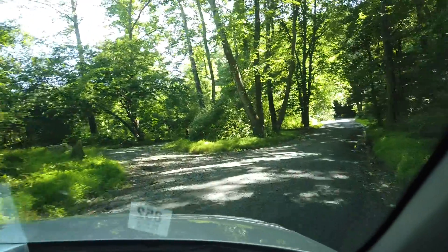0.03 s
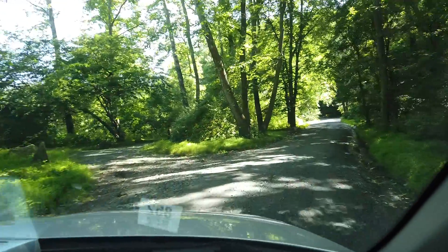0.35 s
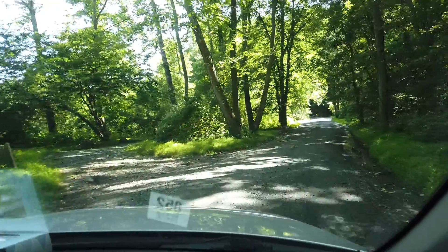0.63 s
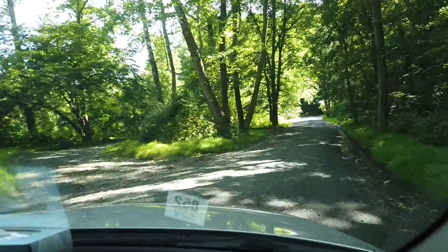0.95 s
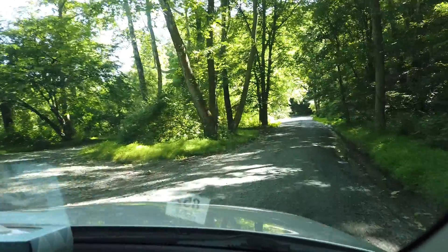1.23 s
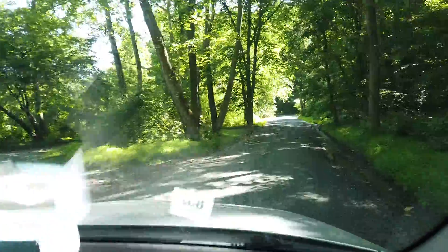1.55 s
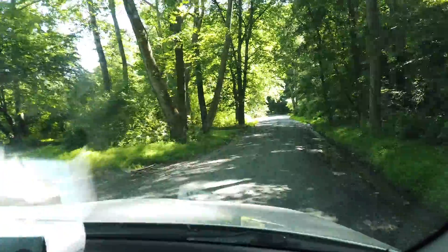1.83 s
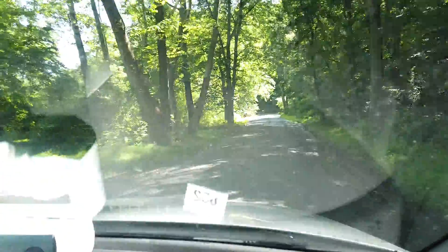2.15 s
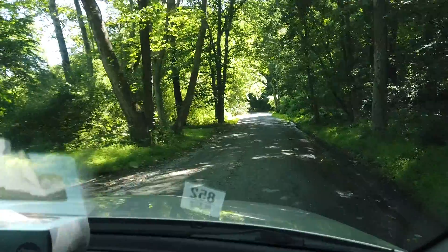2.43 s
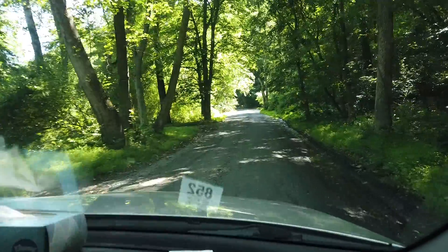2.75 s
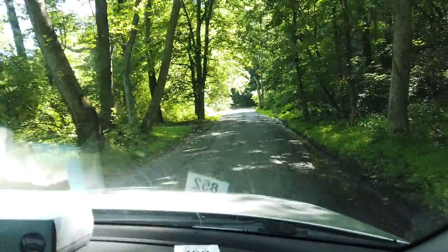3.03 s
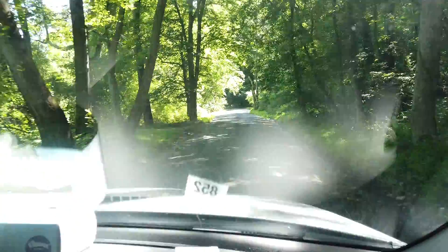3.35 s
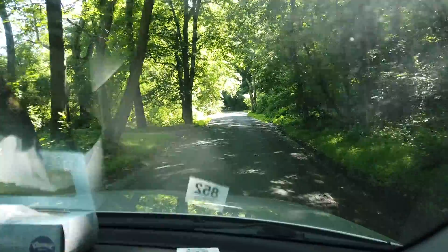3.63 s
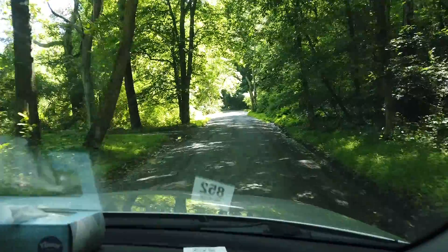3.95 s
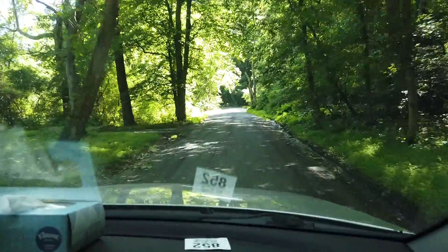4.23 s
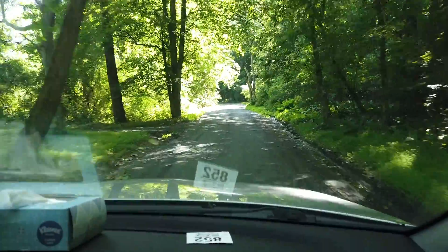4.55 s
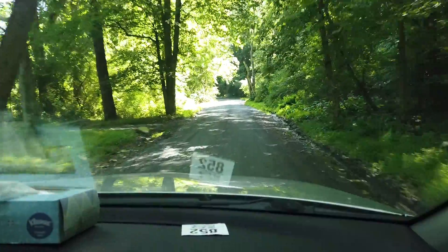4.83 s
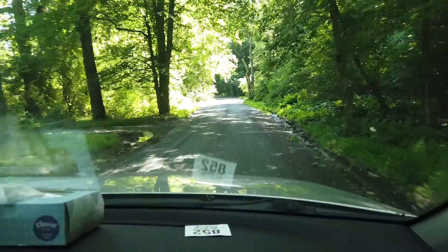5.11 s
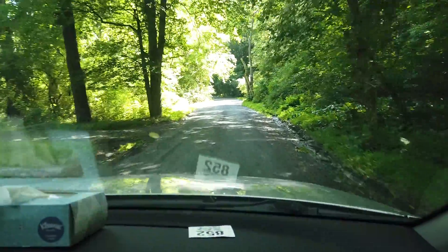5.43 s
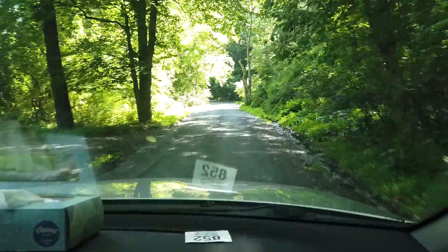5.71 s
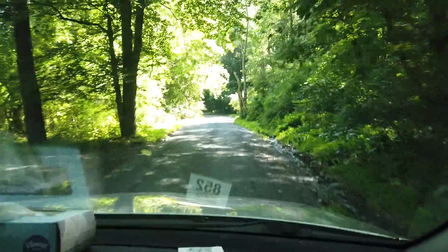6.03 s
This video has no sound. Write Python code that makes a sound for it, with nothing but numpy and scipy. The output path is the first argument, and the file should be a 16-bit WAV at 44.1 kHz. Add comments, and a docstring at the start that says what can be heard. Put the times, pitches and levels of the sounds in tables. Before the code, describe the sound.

A car rolls slowly along a gravel lane, heard from inside for about six seconds. A deep, uneven rumble dominates, with tyre drone and soft, muffled crunching. Small stones pop and briefly grind under the tyres, thickest in the first half second, with more clusters around 2.7, 3.6, 4.1, 4.6 and 6.1 seconds. The low engine note swells and climbs between 0.3 and 1.6 seconds. Ruts bring low jolts near 1.3 and 1.6 seconds and repeatedly from 3.6 to 4.9. Dull suspension knocks come around 2.2 to 2.7 seconds, at 4.7, and from 5.6 to 6. Soft tyre scuffs occur near 0.4 and 4 seconds. A faint gear whine appears at 0.5 and returns from 4 seconds. Tiny trim squeaks come near 2.8, 4.7 and 5.3, and a very faint buzz after 3. Close by, something light and loose rustles and ticks now and then.

```python
"""A car rumbles slowly along a gravel lane, heard from inside the cabin.
Ruts jolt the body while the tyres drone, crunch and scrub; single stones grind in the tread,
pop free and ring the wheel-well liner. The engine climbs as the car pulls away, the gears whine
faintly, the suspension knocks, trim squeaks and a thin buzz passes.
Close by, something light and loose rustles and ticks as it sways."""
import sys
import numpy as np
from scipy import signal
from scipy.fft import rfft, irfft, next_fast_len
from scipy.io import wavfile
from scipy.ndimage import uniform_filter1d

SR = 44100
rng = np.random.default_rng(int(sys.argv[2]) if len(sys.argv) > 2 else 0)


def to_wav(s):
    """Save 16-bit WAV."""
    ch = np.atleast_2d(s).T  # columns
    pcm = np.round(np.clip(ch, -1, 1) * 32767)  # PCM
    wavfile.write(sys.argv[1], SR, pcm.astype(np.int16))


N = 276815
T = np.arange(N) / SR


def amp(db):
    """Decibels to gain."""
    return 10 ** (np.asarray(db) / 20)


def unit(x):
    """Scales to an rms of one."""
    return x / np.sqrt(np.mean(x ** 2) + 1e-30)


def peaked(x, db):
    """Sets the level of the loudest 3 ms."""
    return x * amp(db) / np.sqrt(uniform_filter1d((x ** 2).mean(0), size=130).max())


def add(mix, s, sound):
    """Mixes a stereo sound in at time s."""
    part = mix[:, max(round(s * SR), 0):][:, :sound.shape[1]]
    part += sound[:, :part.shape[1]]


def curves(rows):
    """Turns timed breakpoints into one automation curve per column."""
    times, *columns = np.transpose(rows)
    return [np.interp(T, times, column) for column in columns]


def swell(s, rise_s, fall_s):
    """A rounded envelope of height one that peaks at time s."""
    return np.exp(-.5 * ((T - s) / np.where(T < s, rise_s, fall_s)) ** 2)


def flutter(shape, samples):
    """A fast random modulator: noise smoothed over so many samples."""
    return unit(uniform_filter1d(rng.standard_normal(shape), size=samples))


def eq_db(points, hz):
    """An EQ curve of straight lines over log frequency."""
    freqs, db = np.transpose(points)
    return np.interp(np.log(hz + 1), np.log(freqs + 1), db)


def bell(hz, centre_hz, octaves):
    """A bell-shaped resonance of height one."""
    return np.exp(-.5 * (np.log2((hz + 1) / centre_hz) / octaves) ** 2)


def lifts(modes, hz):
    """The boost in dB from a set of resonances."""
    return sum(db / (1 + (2 * (hz - centre) / width) ** 2) for centre, width, db in modes)


def cabin(hz, spacing_hz=115.5, feedback=.18, fade_hz=1490):
    """Echo between the side windows: a comb filter, in dB, that fades in the treble."""
    kept = feedback / (1 + (hz / fade_hz) ** 4)
    return -20 * np.log10(abs(1 - kept * np.exp(-2j * np.pi * hz / spacing_hz)))


# stereo width: f/Hz, side against mid/dB
WIDTH = [(40, -40), (90, -33), (160, -32), (330, -18.5), (700, -17), (1400, -9.5), (2600, -4.5),
         (4000, 1.5), (6000, 0), (8500, -1.5), (15000, -.5)]
def colour(pair, spectrum, extra_db=lambda hz: 0):
    """Minimum-phase EQ; two unrelated signals become mid and side, so bass is mono and treble wide."""
    n = pair.shape[1]
    size = 2 * next_fast_len(n // 2 + 2048)
    hz = np.fft.rfftfreq(size, 1 / SR)
    cepstrum = irfft(np.log(amp(eq_db(spectrum, hz) + extra_db(hz))), size)
    response = np.exp(rfft(cepstrum * (1 + np.sign(np.fft.fftfreq(size)))))
    width = amp(eq_db(WIDTH, hz))
    mid, side = rfft(pair, size) * response / np.sqrt(1 + width ** 2)
    return irfft(np.array([mid + width * side, mid - width * side]), size)[:, :n]


def noise(spectrum, modes=(), echo=0):
    """A stereo bed of coloured noise, with resonances and a share of cabin echo."""
    white = rng.standard_normal((2, N + SR))
    return unit(colour(white, spectrum, lambda hz: lifts(modes, hz) + echo * cabin(hz))[:, SR:])


def wander(spectrum, depth_db):
    """A randomly drifting gain; the spectrum sets how fast it moves."""
    return unit(amp(depth_db * noise(spectrum)[0]))


def steadied(x, span_s):
    """Levels out swells that last longer than span_s."""
    power = signal.fftconvolve((x ** 2).mean(0), np.hanning(int(span_s * SR)), "same")
    return unit(x / np.sqrt(power + 1e-9))


# roughness of the lane, and single ruts: t/s, rumble level/dB, drone level/dB
LANE = [(0, -26, -40), (.65, -20, -39), (1.4, -23, -38.5), (1.8, -24.5, -37.5), (2.4, -26, -38.5),
        (2.7, -22.5, -37.5), (3.25, -25, -38), (3.9, -26, -39), (4.9, -22.5, -36), (5.35, -25, -38),
        (5.8, -28.5, -33.5), (6.28, -22.5, -35.5)]
RUTS = [(1.06, -31, -36), (1.282, -16.5, -33), (1.6, -16.5, -56), (2.569, -19, -30), (3.591, -14, -36.5),
        (3.71, -23, -32.5), (3.989, -13.5, -59), (4.292, -16, -38), (4.699, -12.5, -47), (4.85, -17, -48),
        (5.578, -20, -28.5), (6.01, -46, -31), (6.26, -22, -39)]
# body rumble and tyre drone: f/Hz, level/dB
RUMBLE_EQ = [(8, -58.5), (16, -27.5), (22, -4), (30, -6.5), (41, -3), (51, -7), (63, -18.5), (90, -48.5),
             (200, -110)]
DRONE_EQ = [(40, -28), (62, 5), (80, 13), (105, 8), (135, 3), (165, -7), (240, -49.5), (600, -110)]
def body():
    """The uneven lane shakes the body and makes the tyres drone; each rut adds a jolt."""
    rumble_gain, drone_gain = amp(curves(LANE))
    for s, rumble_db, drone_db in RUTS:
        jolt = swell(s, rise_s=.03, fall_s=.04)
        rumble_gain = np.hypot(rumble_gain, amp(rumble_db) * jolt)
        drone_gain = np.hypot(drone_gain, amp(drone_db) * jolt)
    rumble = rumble_gain * steadied(noise(RUMBLE_EQ), span_s=.11)
    drone = drone_gain * steadied(noise(DRONE_EQ), span_s=.15)
    return rumble + drone


# tyres on gravel: t/s, roar level/dB, crunch level/dB
TYRES = [(0, -48.5, -48.5), (.5, -50, -59), (.68, -51, -54.5), (1.0, -51, -55.5), (1.6, -50, -55),
         (2.35, -48.5, -53.5), (2.55, -51, -58), (3.3, -50, -57.5), (4.1, -47.5, -58.5),
         (5.3, -47.5, -57.5), (6.0, -44, -57), (6.28, -48.5, -55.5)]
# road roar: f/Hz, level/dB
ROAR_EQ = [(110, -28), (165, 0), (205, 2.5), (265, -5), (320, -10), (400, -12), (470, -15), (530, -20.5),
           (700, -23.5), (850, -22.5), (1100, -42.5), (2000, -41.5), (6000, -100)]
def tyres():
    """The rolling tyres send a lumpy roar through the floor and crunch the gravel."""
    roar_db, crunch_db = curves(TYRES)
    lumps = wander([(1, -14), (3, -2), (9, 0), (16, -8), (40, -60)], depth_db=1.4)
    roar = lumps * steadied(noise(ROAR_EQ, echo=.042), span_s=.27)
    return amp(roar_db) * roar + amp(crunch_db) * gravel()


# gravel crunch: f/Hz, level/dB
CRUNCH_EQ = [(240, -11.5), (420, -0.5), (600, -2.5), (850, -4), (1100, -6), (1500, -5), (2000, -11),
             (2900, -11.5), (3500, -21), (5000, -21.5), (7000, -28.5), (12000, -52.5)]
# resonances of the doors and glass: f/Hz, width/Hz, boost/dB
PANELS = [(836, 130, 4), (951, 76, 4.5), (1510, 18, 2), (1780, 46, 3), (2230, 32, 6.5), (2480, 250, 4.5),
          (2730, 50, 4.5), (2986, 93, 3.5), (3380, 120, 3.5)]
def gravel(grains_per_s=300, pitches=10, spread_db=5.5, ring_db=7, crack_s=.0034, scatter_s=.021):
    """Small stones crack in clumps over a soft wash, muffled by the doors and glass."""
    t = np.arange(SR // 5) / SR
    envelope = np.exp(-t / crack_s) + amp(6) * np.exp(-t / scatter_s)
    clumps = wander([(2, -10), (5, 0), (14, 0), (40, -30), (100, -90)], depth_db=1.3)
    grains = np.zeros((2, N))
    for pitch_hz in np.geomspace(620, 1850, pitches):
        sizes = clumps * amp(spread_db * np.minimum(rng.exponential(1, N), 3))
        hits = sizes * (rng.random(N) < grains_per_s / pitches / SR)
        tone = lambda hz: lifts(PANELS, hz) + cabin(hz) + ring_db * bell(hz, pitch_hz, octaves=.44)
        grain = colour(envelope * rng.standard_normal((2, len(t))), CRUNCH_EQ, tone)
        grains += signal.oaconvolve(hits[None], grain, axes=1)[:, :N]
    wash = noise(CRUNCH_EQ, PANELS, echo=.92)
    return amp(-1.5) * unit(grains) + amp(-8) * wash


# background hiss: f/Hz, level/dB
HISS_EQ = [(3500, -2.5), (5000, -7.5), (7000, -12.5), (9000, -9.5), (10600, -8), (12000, -12),
           (15500, -10.5)]
def hiss():
    """A faint, steady bed of hiss."""
    return amp(-70.5) * noise(HISS_EQ)


# stones squeezed out from under the tyres: t/s, level/dB, f/Hz, treble/dB
POPS = [(0.0535, -35, 860, -18), (0.066, -33, 910, -26), (0.092, -41, 1400, -26), (0.177, -46, 965, -41),
        (0.213, -48, 1180, -36), (0.309, -47.5, 1350, -32), (0.326, -40, 910, -22),
        (0.344, -38.5, 670, -34), (0.383, -44, 704, -35), (0.441, -49, 900, -22), (0.466, -44.5, 630, -17),
        (0.521, -42.5, 1750, -23), (0.712, -48.5, 1440, -11), (0.807, -46, 1210, -29),
        (0.946, -45, 1360, -21), (1.33, -33, 774, -45), (1.403, -44.5, 1230, -31),
        (1.617, -45.5, 1340, -23), (1.696, -40, 950, -42), (1.92, -47.5, 1280, -45), (1.991, -42, 960, -34),
        (2.005, -43, 980, -25), (2.234, -41, 860, -52), (2.55, -40.5, 940, -21), (2.6725, -37.5, 960, -21),
        (2.681, -42.5, 1150, -24), (2.731, -53, 1210, -28), (2.818, -37.5, 1054, -26),
        (2.834, -41, 1330, -27), (2.843, -43.5, 1400, -15), (3.016, -51, 1216, -26), (3.287, -48, 1830, -5),
        (3.375, -46.5, 2144, 7), (3.534, -50.5, 2540, -16), (3.572, -41.5, 880, -38),
        (3.579, -39, 900, -30), (3.586, -38.5, 920, -32), (3.646, -41, 2183, -26),
        (4.021, -46.5, 1375, -29), (4.144, -39.5, 830, -28), (4.154, -39, 800, -31), (4.596, -40, 945, -27),
        (4.608, -43.5, 835, -25), (4.692, -48, 1390, -17), (4.823, -51.5, 2465, -12),
        (4.951, -58, 1980, -8), (5.028, -51.5, 2040, -12), (6.062, -38, 830, -24), (6.068, -35.5, 930, -41),
        (6.076, -41, 910, -9)]
# a stone heard from the cabin: f/Hz, level/dB
STONE_EQ = [(200, -14.5), (480, -1.5), (650, 3), (840, 2.5), (1200, -1), (1750, -5), (2200, -9.5),
            (2900, -10.5), (3700, -22.5), (5200, -23), (7000, -41), (15000, -53.5)]
def pops(usual_hz=900, usual_treble_db=-19.5, ring_db=8, thin_db_per_octave=-5, tail_s=.067):
    """Stones snap off the tread and rattle through the wheel well; small, high ones scrape longer."""
    out, t = np.zeros((2, N)), np.arange(SR // 7) / SR
    for s, db, pitch_hz, treble_db in POPS:
        def tone(hz):
            ring = ring_db * bell(hz, pitch_hz, octaves=.22)
            octaves_below = np.clip(np.log2(pitch_hz / (hz + 1)), 0, max(np.log2(pitch_hz / usual_hz), 0))
            low_cut = thin_db_per_octave * octaves_below  # high stones have less body
            high_shelf = (treble_db - usual_treble_db) * hz ** 2 / (hz ** 2 + 2000 ** 2)
            return .98 * lifts(PANELS, hz) + .63 * cabin(hz) + ring + low_cut + high_shelf

        contact_s = .0032 * (pitch_hz / usual_hz) ** 1.1
        contact = (1 - np.exp(-2 * t / contact_s)) * np.exp(-t / contact_s)
        rattle = unit(amp(2.5 * flutter(len(t), samples=150)))
        crack = colour(contact * rng.standard_normal((2, len(t))), STONE_EQ, tone)
        tail = unit(colour(rattle * rng.standard_normal((2, len(t))), STONE_EQ, tone))
        tail *= (1 - np.exp(-t / contact_s)) * np.exp(-t / tail_s)
        ringing = rattle * liner(t, pitch_hz, contact_s)
        add(out, s - contact_s / 2, peaked(crack, db - 1) + amp(db - 15) * tail + amp(db) * ringing)
    return out


# modes of the plastic wheel-well liner: f/Hz, level/dB, t60/s
LINER = [(590.6, -14, .18), (832, -4, .12), (939, -11.5, 0.13), (1110, -20, 0.32), (1490, -14.5, 0.14),
         (1793, -10, 0.16), (2700, -9, 0.17)]
def liner(t, pitch_hz, contact_s, uneven_db=2.5, detune=.011):
    """The hollow liner rings when struck, most near the stone's pitch and differently at each spot."""
    out = np.zeros((2, len(t)))
    for hz, db, t60 in LINER:
        strength, shift, phase, spread = rng.standard_normal(4)
        stereo_phase = np.array([[1], [-1]]) * spread * amp(eq_db(WIDTH, hz))
        tone = np.sin(2 * np.pi * (hz * (1 + detune * shift) * t + phase) + stereo_phase)
        gain = amp(db + uneven_db * strength) * bell(hz, pitch_hz, octaves=.67)
        out += gain * np.exp(-np.log(1000) * t / t60) * tone
    return out * (1 - np.exp(-t / contact_s))


def slips(n, per_s=900, slip_s=.00025, smooth_db=-4):
    """Friction grit: tiny separate slips of uneven size over a smooth rubbing."""
    sizes = np.minimum(rng.exponential(1, n), 3) ** 2 * (rng.random(n) < per_s / SR)
    power = signal.lfilter([1], [1, -np.exp(-1 / (slip_s * SR))], sizes)
    envelope = np.sqrt(power / (power.mean() + 1e-12) + amp(smooth_db) ** 2)
    return unit(envelope * rng.standard_normal((2, n)))


# the loose thing's touch, thin sizzle and airy top: f/Hz, level/dB
TOUCH_EQ = [(1500, -10), (3000, -5.5), (4200, -13.5), (5000, -7.5), (7000, -9), (8500, -7), (9500, -10.5),
            (10600, -3.5), (11400, -13.5), (13500, -19.5), (15500, -27.5)]
SIZZLE_EQ = [(2000, -23), (6000, -20), (8000, -9), (9500, 10), (10600, 14.5), (11300, 9), (12000, -8),
             (15500, -26)]
AIR_EQ = [(9000, -40), (11500, -6), (12800, 0), (14000, -3), (15500, -8)]
# its resonances: f/Hz, width/Hz, boost/dB
TINKLE = [(4800, 200, 5), (6820, 110, 8), (7380, 120, 7), (8230, 130, 7), (8680, 130, 9), (9690, 80, 8),
          (10170, 90, 6), (10650, 200, 6), (11900, 250, 5)]
# its soft rubs: t/s, rise/s, fall/s, level/dB, sizzle share/0-1, air level/dB
RUBS = [(.085, 0.051, 0.06, -71.5, 0.3, -80), (.342, 0.015, 0.051, -51, 0.7, -66),
        (1.274, 0.011, 0.023, -62.5, 0.8, -82), (1.41, 0.032, 0.027, -66.5, 0.1, -87),
        (1.665, 0.032, 0.047, -65.5, 0, -89), (2.35, 0.075, 0.016, -60.5, 0.4, -67),
        (2.385, 0.028, 0.027, -56.5, 0, -66), (2.5, 0.042, 0.019, -65, 0, -78),
        (2.57, 0.049, 0.026, -58.5, 0, -66.5), (4.8, 0.022, 0.024, -57.5, 0, -81),
        (6.09, 0.024, 0.11, -67, 0, -79)]
def rustle():
    """A loose thing close by rubs in fine slips, between a scrape and a thin sizzle."""
    out, grit = np.zeros((2, N)), slips(N)
    sizzle = unit(colour(grit, SIZZLE_EQ))
    air = unit(colour(grit, AIR_EQ))
    scrape = unit(colour(grit, TOUCH_EQ, lambda hz: lifts(TINKLE, hz)))
    for s, rise_s, fall_s, db, share, air_db in RUBS:
        rub = np.sqrt(share) * sizzle + np.sqrt(1 - share) * scrape
        out += swell(s, rise_s, fall_s) * (amp(db) * rub + amp(air_db) * air)
    return out


# engine note: t/s, f/Hz, level/dB
ENGINE = [(.1, 75.4, -63), (.35, 81.1, -37), (.7, 87.55, -43.5), (.9, 79.7, -40.5), (1.05, 86.1, -29),
          (1.2, 109.2, -45), (1.35, 122.4, -37), (1.52, 140, -43), (1.7, 138, -100)]
def engine():
    """The engine's low note swells and climbs as the car pulls away."""
    hz, db = curves(ENGINE)
    return amp(db) * np.sin(2 * np.pi * np.cumsum(hz) / SR)


# stones caught in the tread: t/s, swell/s, level/dB, f/Hz
GRINDS = [(0.111, 0.017, -55, 1450), (0.256, 0.014, -53, 1340), (.515, 0.031, -53, 1730),
          (0.734, 0.012, -58, 1490), (.96, 0.032, -52.5, 1290), (1.104, 0.027, -55.5, 1146),
          (1.505, 0.011, -50, 1540), (1.565, 0.014, -45.5, 1490), (2.85, 0.037, -52, 1530),
          (3.027, .009, -50, 1240), (4.603, 0.011, -48.5, 1330)]
def grinds(ring_db=11, chatter_db=.5):
    """A trapped stone chatters in quick uneven slips, ringing around one pitch."""
    out = np.zeros((2, N))
    chatter = unit(amp(chatter_db * flutter(N, samples=130)))
    for s, swell_s, db, pitch_hz in GRINDS:
        near = abs(T - s) < .1
        push = swell(s, swell_s, swell_s)[near]
        friction = push * chatter[near] * rng.standard_normal((2, near.sum()))
        tone = lambda hz: lifts(PANELS, hz) + ring_db * bell(hz, pitch_hz, octaves=.21)
        out[:, near] += amp(db) * unit(colour(friction, STONE_EQ, tone)) * np.sqrt(np.mean(push ** 2))
    return out


# gear whine: t/s, f/Hz, level/dB, level of the fifth above/dB
WHINE = [(.3, 308, -69, -90), (.48, 350, -49, -77), (.62, 368, -78.5, -90), (3.0, 278.6, -77.5, -85.5),
         (4.0, 312, -55, -66.5), (4.35, 328, -56, -60), (4.55, 336.3, -48, -84), (4.72, 345, -59, -80),
         (4.9, 351, -51.5, -75), (5.15, 362.6, -63.5, -78), (5.65, 368.3, -54, -86), (6.0, 357.3, -58, -74),
         (6.28, 355, -82, -69)]
def gear_whine(tremolo_db=4, waver=.0207):
    """The gears sing two thin tones a fifth apart, wavering at random in pitch and level."""
    hz, db, fifth_db = curves(WHINE)
    drift = [(1, 0), (18, 0), (45, -25), (100, -90)]
    vibrato, tremolo = noise(drift)[0], noise(drift)[0]
    phase = 2 * np.pi * np.cumsum(hz * (1 + waver * vibrato)) / SR
    tones = amp(db) * np.sin(phase) + amp(fifth_db) * np.sin(1.5 * phase)
    return amp(tremolo_db * tremolo) * tones


# light ticks of the loose thing: t/s, peak level/dB, f/Hz
TICKS = [(0.337, -57, 10300), (0.471, -54, 8450), (0.616, -62.5, 12600), (1.258, -47.5, 8427),
         (1.294, -56.5, 8700), (1.38, -52.5, 8780), (1.486, -58.5, 8900), (1.66, -51, 8800),
         (1.679, -56, 7000), (2.381, -54, 8800), (2.392, -58, 8450), (2.491, -47, 9500),
         (2.521, -53, 10500), (2.565, -51, 10400), (3.326, -42.5, 7400), (3.702, -55, 10000),
         (3.806, -58, 10300), (4.089, -55.5, 10140), (4.157, -55.5, 9760), (4.638, -56, 8540),
         (4.779, -49, 8170), (5.845, -59, 7600), (6.071, -49, 8570), (6.077, -50, 8350)]
def ticks(snap_s=.0012, hiss_db=-5.5, tail_db=-23, tail_s=.045):
    """Sharp, high ticks, each with a short soft hiss around it and a faint ringing tail."""
    out, t = np.zeros((2, N)), np.arange(-SR // 20, SR // 6) / SR
    for s, db, pitch_hz in TICKS:
        ring_db = 6 + .1 * max(-50.5 - db, 0)  # the lightest ticks ring purest
        tone = lambda hz: lifts(TINKLE, hz) + ring_db * bell(hz, pitch_hz, octaves=.11)
        hiss_s = np.where(t < 0, .011, .012) / amp(.25 * (db + 45))  # shorter around louder ticks
        snap = np.exp(-abs(t) / snap_s)
        soft_hiss = amp(hiss_db) * np.exp(-abs(t) / hiss_s)
        tail = (t > 0) * amp(tail_db) * np.exp(-abs(t) / tail_s)
        tick = (snap + soft_hiss + tail) * slips(len(t))
        add(out, s + t[0], peaked(colour(tick, TOUCH_EQ, tone), db))
    return out


# a hollow scuff: f/Hz, level/dB
SCRUB_EQ = [(250, -23.5), (390, 1), (470, -6), (600, -4.5), (1000, -18.5), (2500, -17), (6000, -52)]
# tyre slides: t/s, rise/s, fall/s, level/dB, f/Hz
SCRUBS = [(.43, 0.061, 0.069, -51.5, 600), (4.029, 0.039, 0.12, -53.5, 416)]
def scrubs(ring_db=6):
    """A tyre slides over loose stones with a hollow scuff."""
    out = np.zeros((2, N))
    for s, rise_s, fall_s, db, pitch_hz in SCRUBS:
        near = abs(T - s) < .35
        tone = lambda hz: cabin(hz) + ring_db * bell(hz, pitch_hz, octaves=.2)
        scuff = colour(rng.standard_normal((2, near.sum())), SCRUB_EQ, tone)
        out[:, near] += amp(db) * swell(s, rise_s, fall_s)[near] * unit(scuff)
    return out


# suspension knocks: t/s, peak level/dB, f/Hz
KNOCKS = [(2.247, -24.5, 222), (2.537, -24.5, 224), (2.564, -32, 225), (2.602, -31, 226), (2.664, -34, 227),
          (4.74, -32, 211), (5.585, -29, 245), (5.875, -33.5, 310), (5.994, -29, 212), (6.03, -29.5, 225)]
def knocks(swell_s=.0042):
    """A wheel drops off a stone: a few dull cycles through the suspension."""
    out = np.zeros(N)
    for s, db, pitch_hz in KNOCKS:
        out += amp(db) * np.exp(-((T - s) / swell_s) ** 2) * np.cos(2 * np.pi * pitch_hz * (T - s))
    return out


# trim squeaks: t/s, swell/s, level/dB, f/Hz, second harmonic against the first/dB
SQUEAKS = [(2.845, 0.019, -54, 1470, -6), (2.865, 0.018, -60, 1517, -3.5), (4.669, 0.013, -53.5, 1552, -17),
           (5.323, 0.0091, -53.5, 1557, -14)]
def squeaks(waver=.018, roughness=.58, third_db=-21):
    """Trim sticks and slips as the body twists: an unsteady, rasping tone with two overtones."""
    out = np.zeros((2, N))
    jitter = noise([(5, -6), (40, 0), (250, -4), (800, -40), (2000, -90)])[0]
    for s, swell_s, db, hz, second_db in SQUEAKS:
        near = abs(T - s) < .1
        phase = 2 * np.pi * np.cumsum(hz * (1 + waver * jitter)) / SR
        for harmonic, partial_db in enumerate([0, second_db, third_db], start=1):
            rasp = 1 + roughness * flutter((2, near.sum()), samples=110)
            tone = np.sqrt(2) * np.sin(harmonic * phase[near]) * rasp
            out[:, near] += amp(db + partial_db) * swell(s, swell_s, swell_s)[near] * tone
    return out


# faint buzz: t/s, rise/s, fall/s, level/dB
BUZZ = [(3.22, 0.093, 0.26, -71)]
def buzz(pitch_hz=2980, width_hz=90):
    """A narrow, fuzzy tone swells once and fades."""
    envelope = sum(amp(db) * swell(s, rise_s, fall_s) for s, rise_s, fall_s, db in BUZZ)
    return envelope * noise([(1500, -60), (pitch_hz, 0), (5000, -60)], modes=[(pitch_hz, width_hz, 25)])


def scene():
    """The cabin mix, with the loose thing a touch to the right."""
    road = body() + tyres() + scrubs() + pops() + grinds()
    car = knocks() + squeaks() + engine() + gear_whine() + buzz()
    loose_thing = (rustle() + ticks()) * amp([[-.3], [.3]])
    return road + car + loose_thing + hiss()


def record(dry, cutoff_hz=15700):
    """A brief fade at each end and a steep high cut."""
    faded = dry * signal.windows.tukey(N, .002)
    high_cut = signal.firwin(511, cutoff_hz, window=("kaiser", 9), fs=SR)
    return signal.oaconvolve(faded, high_cut[None], "same")


dry = scene()
out = record(dry)
to_wav(out)
```